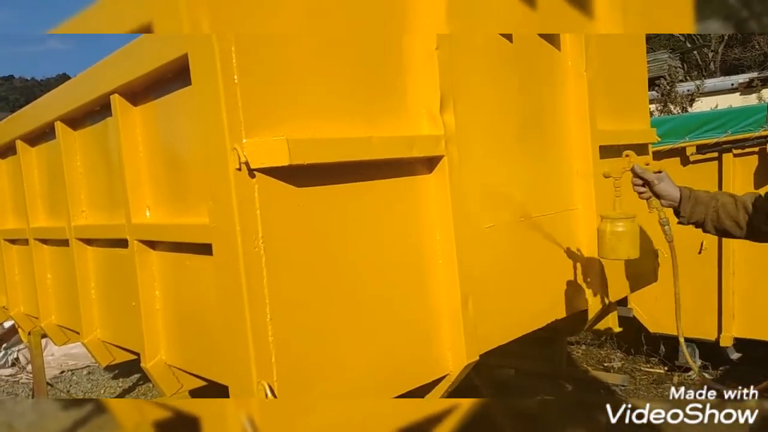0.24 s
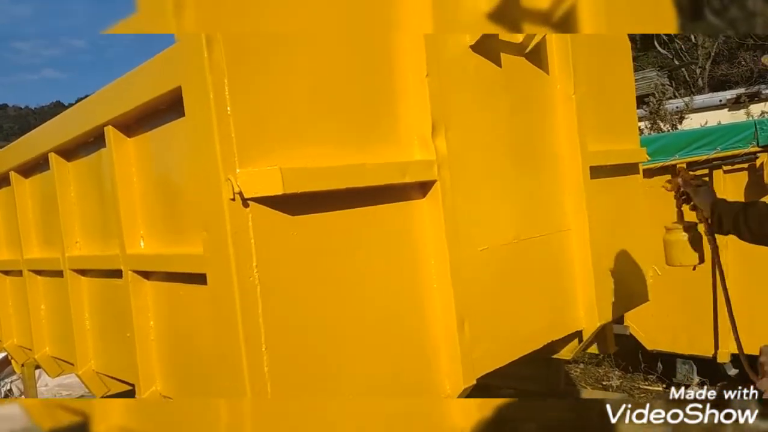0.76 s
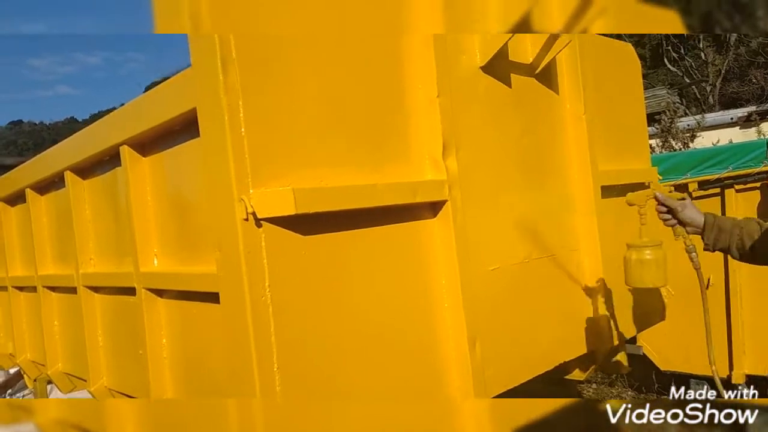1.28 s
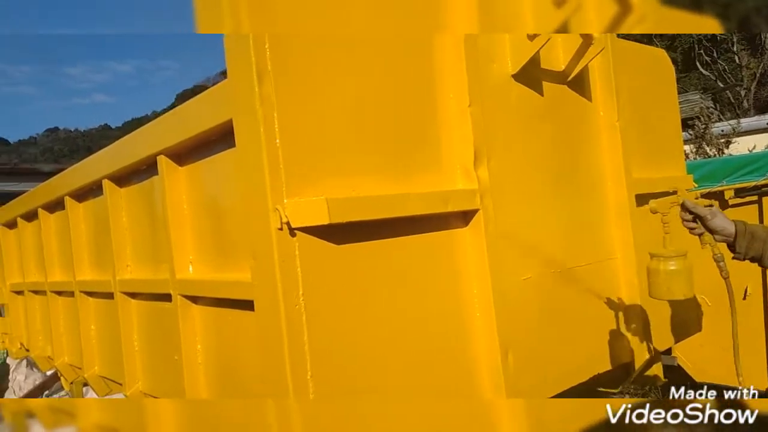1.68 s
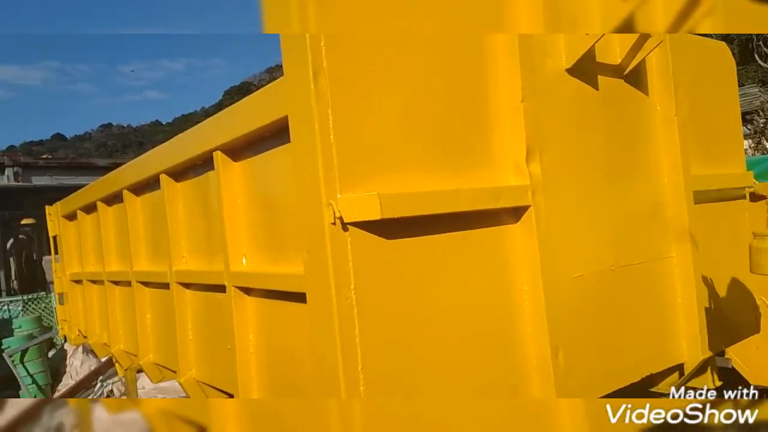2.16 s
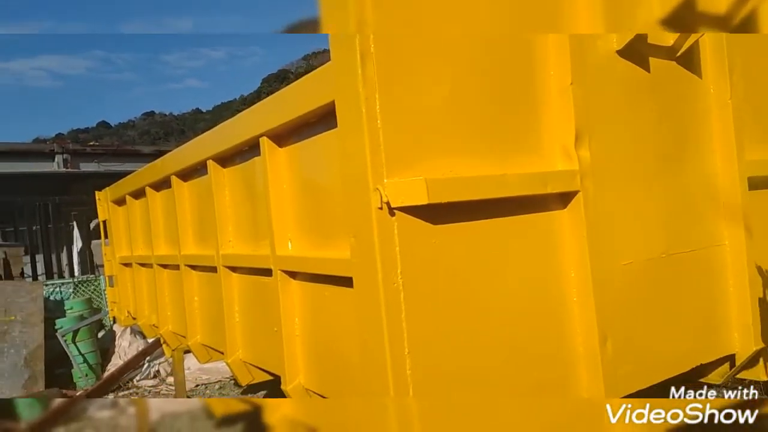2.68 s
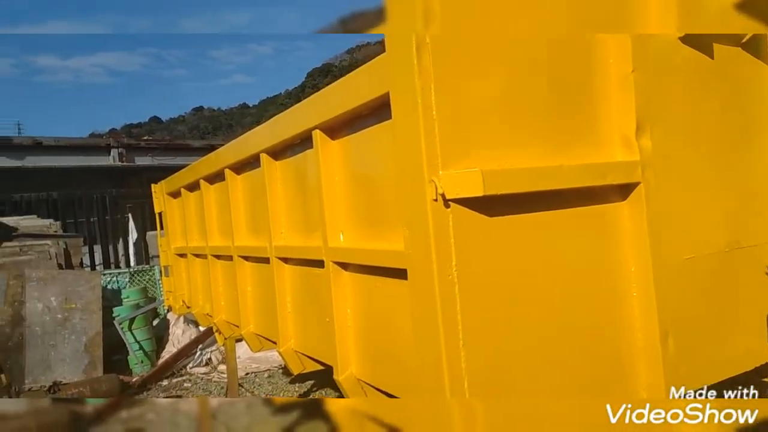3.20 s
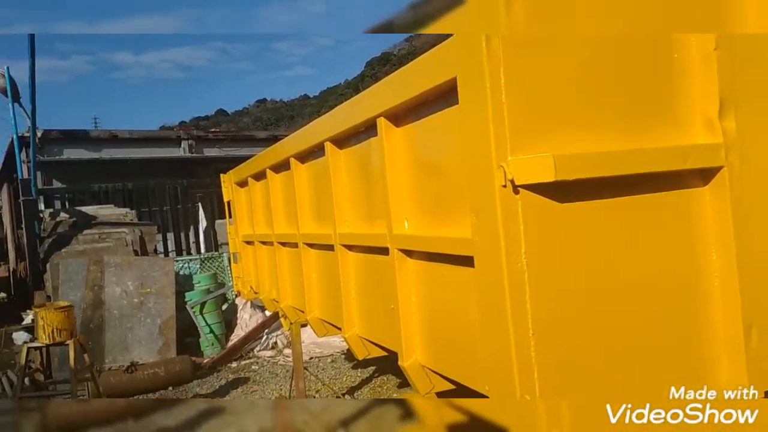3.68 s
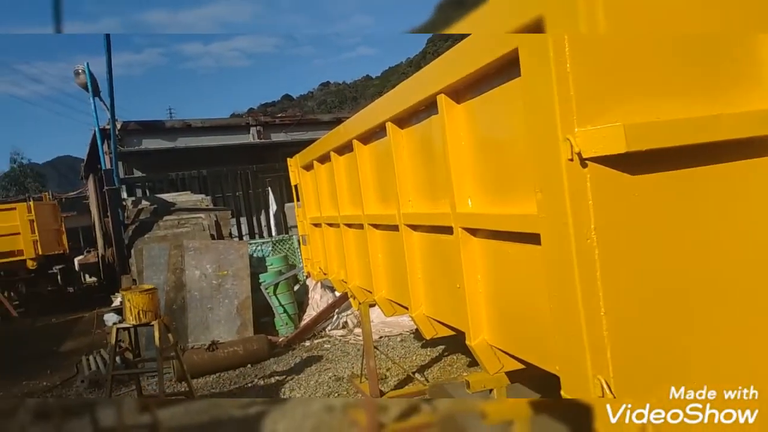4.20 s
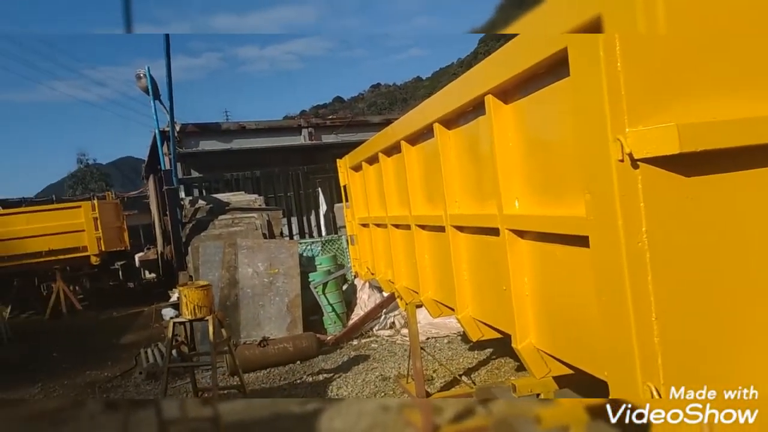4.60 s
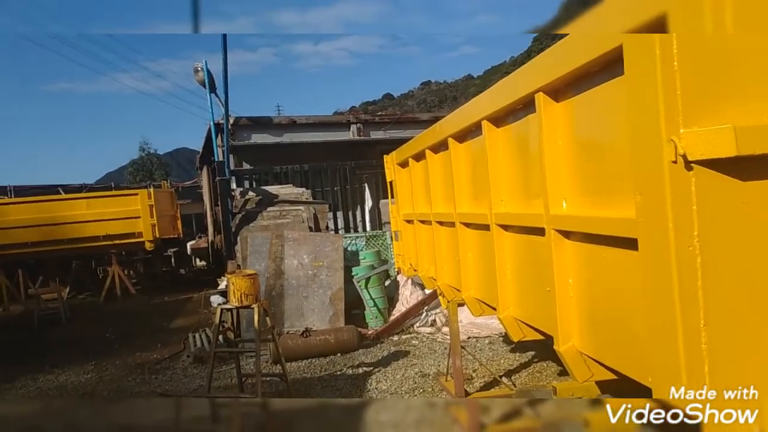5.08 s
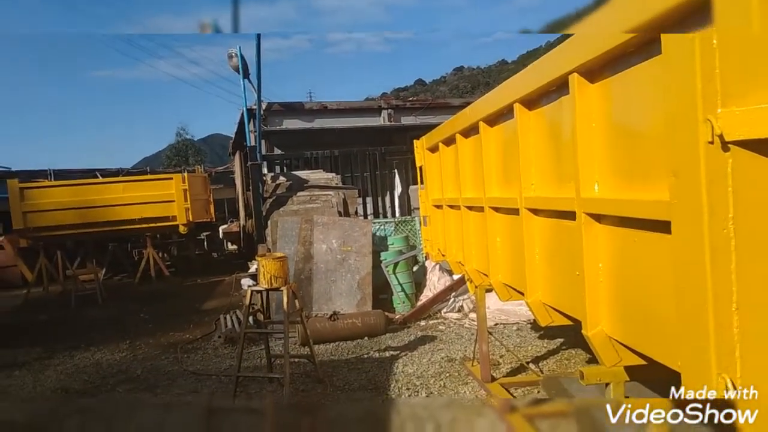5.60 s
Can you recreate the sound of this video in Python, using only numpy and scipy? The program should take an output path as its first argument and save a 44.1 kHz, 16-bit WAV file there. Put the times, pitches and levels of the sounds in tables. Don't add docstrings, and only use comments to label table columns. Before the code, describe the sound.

A loud, bright hiss of compressed air from a paint spray gun fills the whole six seconds, outdoors beside a big steel wall. It starts strong, fades to a softer, thinner rush by about 0.85 s, then swells to a peak around 1.5-1.7 s. It sinks again near 2.4 s, rises to another peak at about 3.2-3.5 s, drops to a low at 4.1 s, peaks strongly near 5.0 s and tapers toward the end. At the peaks, close reflections from steel and ground give a hollow, phasing sheen; the left side rings around 7 kHz, the right somewhat higher, with small balance shifts. There is little bass: only faint wind puffs, most noticeable in the first second, and a very quiet distant yard murmur. The close handheld stereo camera sound has treble ending near 16 kHz and slightly blippy, compressed lows. The jet never fully cuts off.

```python
import sys
import numpy as np
from scipy import signal
from scipy.io import wavfile
from scipy.ndimage import uniform_filter1d

SR = 44100
rng = np.random.default_rng(int(sys.argv[2]) if len(sys.argv) > 2 else 0)


def invert_db(level):
    return 10 ** (np.asarray(level, dtype=float) / 20)


def generate_wav(sig):
    pcm = np.round(np.clip(np.atleast_2d(sig).T, -1, 1) * 32767).astype(np.int16)
    wavfile.write(sys.argv[1], SR, pcm)


N = 257984
FRAME = 1024


def frames():
    return signal.stft(rng.standard_normal((2, N)), SR, nperseg=FRAME, noverlap=FRAME * 3 // 4)


def samples(z):
    return signal.istft(z, SR, nperseg=FRAME, noverlap=FRAME * 3 // 4)[1][..., :N]


def unit(x):
    return x / np.sqrt(np.mean(np.abs(x) ** 2) + 1e-20)


def along(points, hz):
    f, v = np.transpose(points)
    return np.interp(np.log(hz + 1), np.log(f + 1), v)[:, None]


def curves(rows, t):
    s, *cols = np.transpose(rows)
    return [np.interp(t, s, c) for c in cols]


def bumps(t, at, length, *heights, order=2):
    bells = np.exp(-np.abs((t[:, None] - at) / length) ** order)
    return np.array([bells @ h for h in heights])


def patches(shape, wide, long):
    across_bins = uniform_filter1d(rng.standard_normal(shape), wide, -2)
    return unit(uniform_filter1d(across_bins, long, -1))


def delay(hz, ms):
    return np.exp(-2j * np.pi * hz[:, None] * ms / 1000)


def yard():
    # f/Hz, level per Hz/dB
    colour = [(200, -5.5), (350, -5.5), (500, -1), (600, -4), (700, 3.5), (830, -3), (1000, -4.5),
              (1600, 0), (2200, 2.5)]
    level_db, wander_db, difference = -43.5, 1.52, 0.6
    hz, t, (a, b) = frames()
    murmur = np.array([a + difference * b, a - difference * b])
    drift = invert_db(wander_db * patches((1, len(t)), wide=1, long=30))
    spectrum = invert_db(along([(90, -53.0)] + colour + [(3500, -43.5)], hz))
    return invert_db(level_db) * unit(samples(spectrum * drift * murmur))


def wind():
    # f/Hz, level per Hz/dB
    rumble = [(12, -33), (20, 22), (49, 12.5), (91, -9), (150, 10), (270, -2.5), (420, -24.5), (520, -134),
              (880, -120)]
    # t/s, peak/dB, length/s
    gusts = [(0.074, -44.5, 0.028), (0.381, -40, 0.061), (0.703, -46, 0.18), (0.922, -53, 0.035),
             (1.105, -55, 0.046), (1.568, -52.5, 0.072), (2.01, -45.5, 0.04), (2.198, -51.5, 0.038),
             (2.462, -49.5, 0.16), (2.808, -52, 0.14), (3.259, -50.5, 0.074), (3.498, -50, 0.016),
             (3.755, -52.5, 0.033), (4.193, -57, 0.28), (4.678, -63, 0.081), (5.027, -54, 0.15),
             (5.413, -57, 0.18), (5.765, -47.5, 0.057)]
    # t/s, peak/dB, length/s
    breeze = [(4.4, -54, 1.4)]
    calm_db, gain_db = -91, 3.0
    hz, t, z = frames()
    shared = np.array([z[0] + .35 * z[1], z[0] - .35 * z[1]])
    lumps = invert_db(4 * patches(z.shape[1:], wide=4, long=6))
    spectrum = unit(invert_db(along(rumble + [(700, -85)], hz)))
    at, peak_db, length = np.transpose(gusts + breeze)
    puffs = invert_db(calm_db) + bumps(t, at, length, invert_db(peak_db))[0]
    envelope = np.interp(np.arange(N) / SR, t, puffs)
    return invert_db(gain_db) * envelope * unit(samples(spectrum * lumps * shared))


def jet():
    # t/s, left port lag/ms
    turn = [(0, 0.079), (1.2, -0.051), (1.55, 0.21), (1.9, -0.051), (3.1, -.1), (3.7, -0.33), (5.85, -0.42)]
    alike = 0.5
    hz, t, own = frames()
    common = frames()[2][0]
    lag_ms, = curves(turn, t)
    turbulence_db = .8 * patches(common.shape, wide=12, long=10) + .5 * patches(common.shape, wide=60, long=4)
    ports = [np.sqrt(alike) * common * delay(hz, side * lag_ms) + np.sqrt(1 - alike) * scattered
             for side, scattered in zip((.5, -.5), own)]
    return hz, t, np.array(ports) * invert_db(turbulence_db)


def wall_echo(hz, t):
    # f/Hz, share of the echo
    reflection = [(3000, 0.72), (9000, 1.7), (15000, 0.51)]
    # t/s, left strength, right strength, left comb spacing/Hz, right comb spacing/Hz
    passes = [(0.02, 0.33, 0, 4340, 6300), (1.572, 0.1, 0.13, 4190, 5210), (3.28, 0.2, 0.1, 3843, 4260),
              (4.97, 0, 0.17, 5295, 4200)]
    # t/s, left/dB, right/dB
    lobe = [(.05, 1, 1), (1.27, -1.5, -2.5), (1.55, 0, 3), (1.85, -0.5, -2.5), (3.25, 1.5, 2),
            (3.53, -2, -1), (4.97, 1.5, -0.5), (5.27, -2.5, -2)]
    at, left, right, *_ = np.transpose(passes)
    near = bumps(t, at, 0.17, left, right)
    spacing_hz = curves(passes, t)[2:]
    at, left_db, right_db = np.transpose(lobe)
    lobe_db = bumps(t, at, 0.13, left_db, right_db, order=4)
    lobe_shape = np.exp(-((hz[:, None] - 4770) / 1120) ** 2)
    ports = []
    for p, far in enumerate((0.042, 0.048)):
        strength = (far + near[p]) * along(reflection, hz)
        comb = 1 + strength * delay(hz, 1000 / spacing_hz[p])
        ports.append(comb * invert_db(lobe_db[p] * lobe_shape))
    return np.array(ports)


def ground_echo(hz, t):
    # t/s, delay/ms, strength
    ground = [(0.299, 1.67, 0), (1.402, 1.5, 0.13), (3.15, 1.46, 0.18), (4.302, 1.38, 0.06),
              (5.049, 1.23, 0.17)]
    far, length_s, low_hz, low_ms = 0.058, 0.37, 3330, 1.84
    at, _, strength = np.transpose(ground)
    near = far + bumps(t, at, length_s, strength)[0]
    echo = near * delay(hz, curves(ground, t)[0])
    low_echo = delay(hz, low_ms) / (1 + (hz[:, None] / low_hz) ** 6)
    return np.array([(1 + share * echo) * (1 + low_share * low_echo)
                     for share, low_share in zip((0.49, 1.2), (.1, 0.55))])


def port_cavities(hz, t):
    # f/Hz, level per Hz/dB
    left_colour = [(400, -49), (900, -32), (1500, -33.5), (2500, -20), (3500, -16), (5000, -10.5),
                   (6000, -4), (6800, 0), (7600, -5), (8900, -10), (10000, -15.5), (11500, -14),
                   (13500, -13), (14500, -9), (15800, -10.5)]
    # f/Hz, level per Hz/dB
    right_colour = [(400, -51.5), (900, -31.5), (1500, -30.5), (2600, -22), (3500, -18.5), (4500, -16.5),
                    (6000, -15), (7500, -10.5), (8800, -10), (9700, -4), (10500, 0.5), (11500, -2),
                    (13000, -6.5), (15800, -12)]
    # t/s, left lift/dB, left centre/Hz, right lift/dB, right centre/Hz
    ringing = [(.15, 1.24, 7330, 2, 11700), (1.57, -1, 7160, 6, 9600), (3.251, 2, 7320, 3, 8240),
               (4.97, 2.5, 7180, 4, 8070)]
    length_s, wide_hz, top_hz = 0.21, (913, 1100), 15770
    at, left_db, _, right_db, _ = np.transpose(ringing)
    lift_db = bumps(t, at, length_s, left_db, right_db, order=4)
    centre_hz = curves(ringing, t)[1::2]
    ports = []
    for p, colour in enumerate((left_colour, right_colour)):
        ring_db = lift_db[p] * np.exp(-((hz[:, None] - centre_hz[p]) / wide_hz[p]) ** 4)
        ports.append(unit(invert_db(along(colour, hz))) * invert_db(ring_db) * (hz[:, None] < top_hz))
    return np.array(ports)


def swing_db(hz, t):
    # t/s, level/dB, left over right/dB, left treble lift as the nozzle turns/dB
    sweep = [(0, -17, 0.5, 3), (.17, -18.5, -2.5, 4), (.45, -20.5, 2, 10), (.85, -24.5, -1, 4),
             (1.15, -20, -1.5, 12), (1.28, -19.5, 3.5, 1), (1.44, -17, -1.5, 6), (1.7, -17, -1.5, 2),
             (1.9, -19.5, 2, 6), (2.45, -24, -0.5, 0.5), (2.76, -21, 4.5, 3), (3.2, -17.5, -0.54, 3),
             (3.5, -18, 2, 0.5), (4.12, -24.5, 2.5, -1.5), (4.65, -19, 2.5, 0), (4.98, -16.5, -2.1, 5.5),
             (5.25, -18.5, 3, -1.5), (5.85, -22.5, -0.5, 1)]
    # f/Hz, left and right extra per level/(dB/dB), left and right drift as the camera turns/(dB/s)
    motion = [(2500, .3, 0, -.3, 0.0033), (3890, 0.15, 0.23, -0.43, 0.072), (6240, -0.14, 0.28, 0.043, 0),
              (8070, 0.087, 0.077, 0.18, 0.27), (10000, -0.34, 0, 0.82, 0),
              (12500, -0.083, 0, 0.082, 0.0028), (15000, 0, 0.42, -0.25, .2)]
    port_db, treble_start_db, treble_drift_db_per_s = 4.5, (-6, 1.5), (0, -1)
    level_db, pan_db, turn_db = curves(sweep, t)
    slopes = curves(motion, hz[:, None])
    beam = 1 / (1 + (12000 / (hz[:, None] + 1)) ** 10)
    ports = []
    for p, side in enumerate((.5, -.5)):
        treble_db = (1 - p) * turn_db + treble_start_db[p] + treble_drift_db_per_s[p] * t
        colour_db = slopes[p] * (level_db - level_db.mean()) + slopes[2 + p] * (t - t.mean())
        ports.append(level_db + port_db + side * pan_db + treble_db * beam + colour_db)
    return np.array(ports)


def gun():
    hz, t, hiss = jet()
    echoes = wall_echo(hz, t) * ground_echo(hz, t)
    return samples(hiss * echoes * port_cavities(hz, t) * invert_db(swing_db(hz, t)))


def scene():
    return wind() + yard() + gun()


def camera_rounding(x):
    # f/Hz, left step/dB, right step/dB, share set by the coarse spells (rest follows hiss loudness)
    steps = [(40, -30, -30, 1), (150, -29, -29, 1), (300, -32, -27, 1), (500, -31, -28, 1),
             (700, -27, -29.5, 1), (900, -26, -26.5, 1), (1250, -26, -27.5, 1), (1650, -23, -27.5, .9),
             (1900, -22, -25, .9), (2300, -21, -23.5, .8), (2700, -23, -23, .7), (3400, -21, -20.5, .5),
             (4600, -17, -18, .1), (6000, -14, -19, .1), (8000, -16, -21, .1)]
    # t/s, step drop/dB
    relief = [(1.12, 6.5), (1.6, 8), (2.27, 6), (2.6, 4.5), (2.79, 8), (2.9, 12), (3.5, 5), (3.86, -2),
              (4.12, 4.5), (4.39, 6), (4.83, 7), (5.02, 10), (5.18, 9)]
    # t/s, length/s, left step rise/dB, right step rise/dB
    shortages = [(0.005, 0.017, -2, 12), (0.211, 0.13, 1, 2), (0.725, 0.055, 3.5, 7),
                 (0.902, 0.07, 0.5, -3.2), (1.559, 0.13, 9, 11.5), (1.956, 0.089, 4.5, -3),
                 (2.366, 0.076, 2.5, 5.5), (2.694, 0.065, 3, 0.5), (3.018, 0.06, 2.5, 1.5),
                 (3.244, 0.12, 6.5, 6), (4.242, .12, 3.5, 3), (4.512, 0.056, 3, 0.6),
                 (4.914, 0.065, 3.5, 12), (5.103, 0.096, 1, 1), (5.72, 0.16, -1, 1)]
    hop, lines_kept, offset = 1024, 380, 170
    usual_rise_db, lift_db, bass_lift_db = (2, 0.65), 5, 2
    drift_db, follow_loud, round_up = 3.5, 1.15, .33

    n, k = np.arange(2 * hop)[:, None], np.arange(lines_kept)
    fade = np.cumsum(np.kaiser(hop + 1, 4 * np.pi))
    fade = np.sqrt(fade[:-1] / fade[-1])
    window = np.concatenate([fade, fade[::-1]])[:, None]
    basis = window * np.cos(np.pi / hop * (n + .5 + hop / 2) * (k + .5)) * np.sqrt(2 / hop)
    count = N // hop + 2
    padded = np.pad(x, ((0, 0), (hop - offset, count * hop - N + offset)))
    halves = padded.reshape(2, -1, hop)
    lines = np.concatenate([halves[:, :-1], halves[:, 1:]], axis=2) @ basis

    t = (np.arange(count) * hop + offset) / SR
    at, length, left_db, right_db = np.transpose(shortages)
    rise_db = bumps(t, at, length, left_db, right_db) + np.array(usual_rise_db)[:, None]
    rise_db[0] -= sum(db * (np.abs(t - s) < .018) for s, db in relief)
    wander_db = drift_db * patches(lines.shape, wide=3, long=24)
    loud_db = 10 * np.log10(np.mean(lines[..., 150:] ** 2, axis=2, keepdims=True) + 1e-9)
    loud_db -= loud_db.mean(axis=1, keepdims=True)
    *base_db, share = curves(steps, (k + .5) * SR / 2 / hop)
    step_db = np.array(base_db)[:, None] + share * rise_db[..., None] + (follow_loud - share) * loud_db
    step_db = step_db + wander_db + share * (lift_db + bass_lift_db * (k < 14))
    step = invert_db(step_db)

    rounded = np.sign(lines) * np.floor(np.abs(lines) / step + round_up) * step
    error = (rounded - lines) @ basis.T
    halves[:, :-1] += error[..., :hop]
    halves[:, 1:] += error[..., hop:]
    return halves.reshape(2, -1)[:, hop - offset:][:, :N]


def low_pass(x):
    return signal.sosfilt(signal.butter(12, 15850, fs=SR, output="sos"), x)


def record(dry):
    mix = np.clip(camera_rounding(dry), -1, 1)
    return low_pass(mix)


dry = scene()
out = record(dry)
generate_wav(out)
```